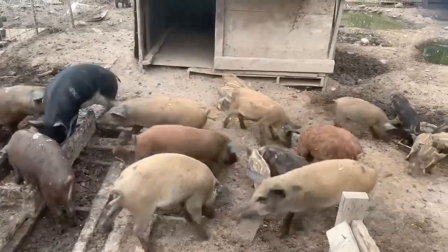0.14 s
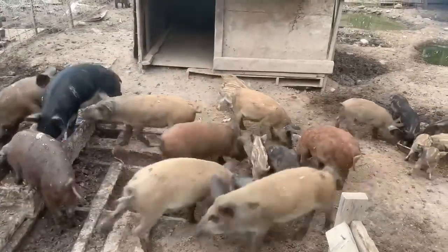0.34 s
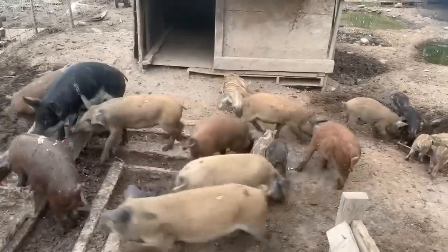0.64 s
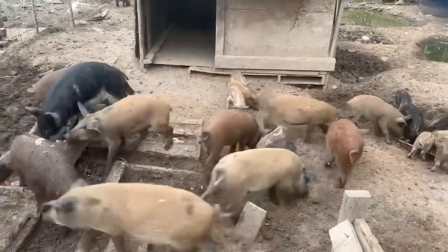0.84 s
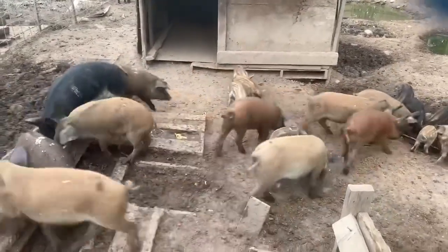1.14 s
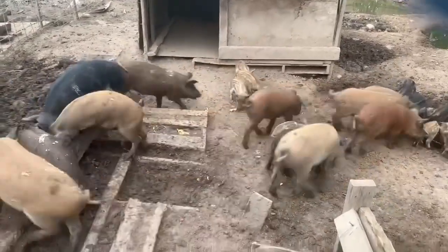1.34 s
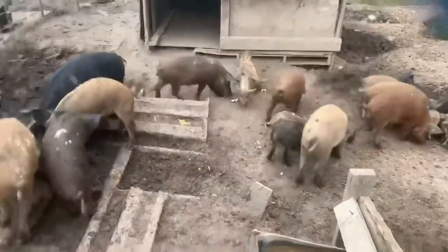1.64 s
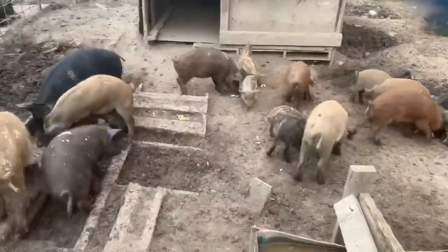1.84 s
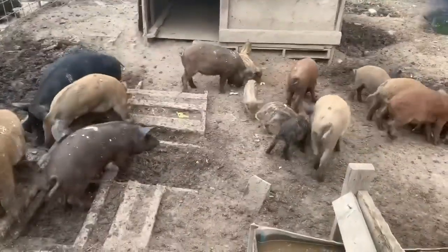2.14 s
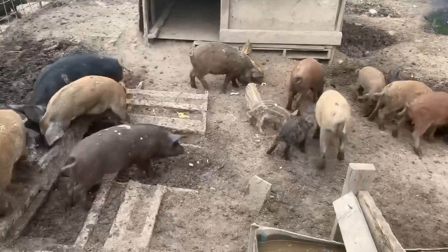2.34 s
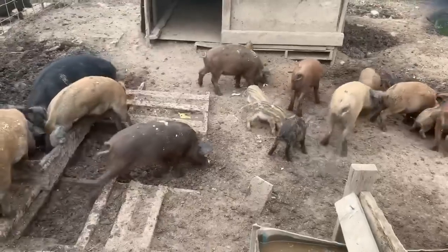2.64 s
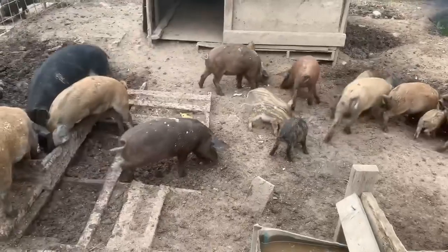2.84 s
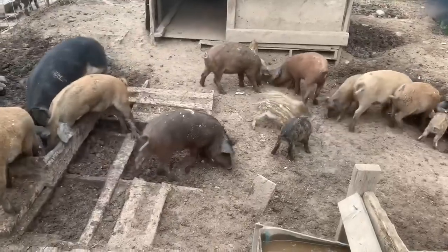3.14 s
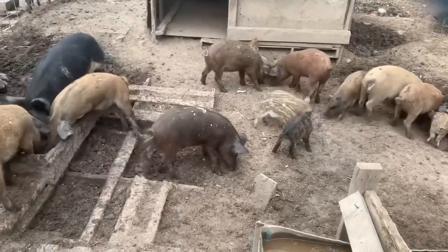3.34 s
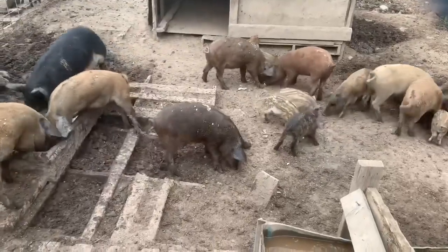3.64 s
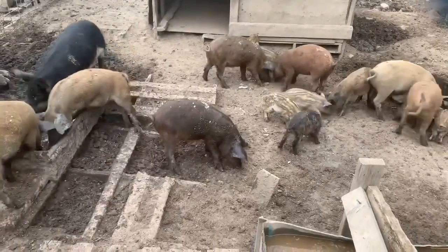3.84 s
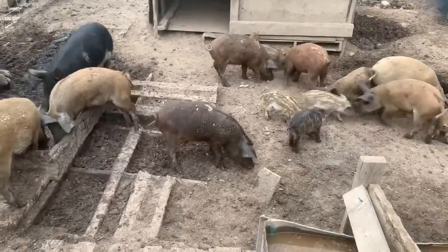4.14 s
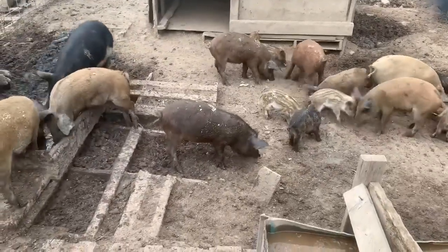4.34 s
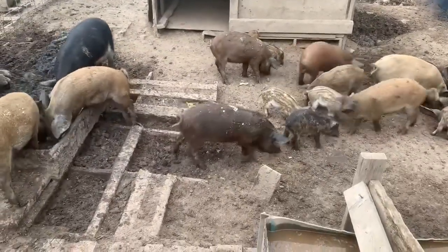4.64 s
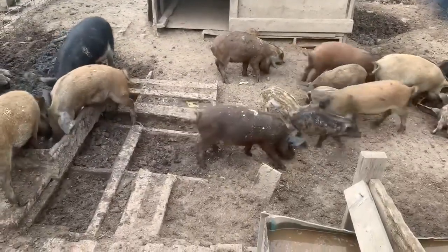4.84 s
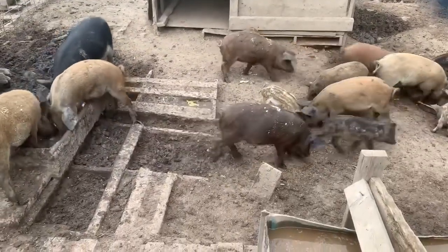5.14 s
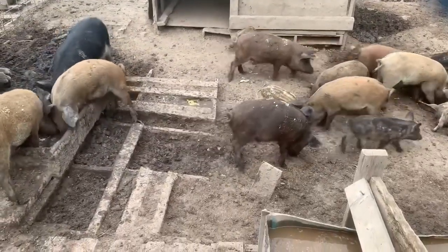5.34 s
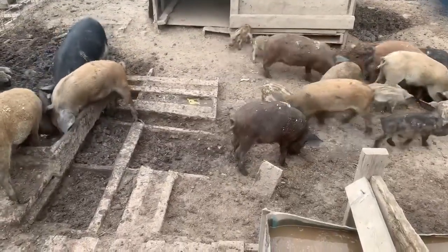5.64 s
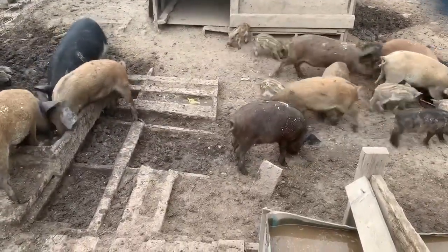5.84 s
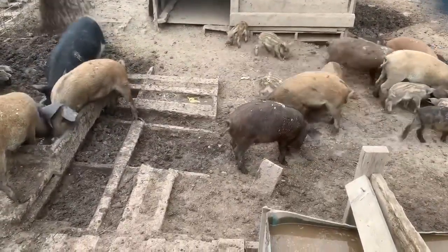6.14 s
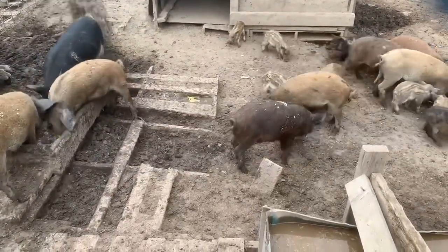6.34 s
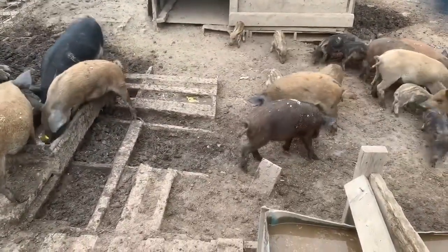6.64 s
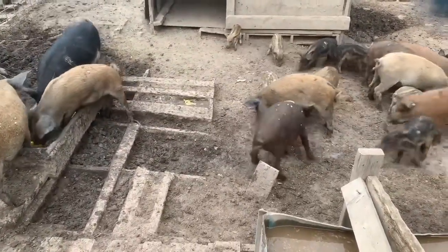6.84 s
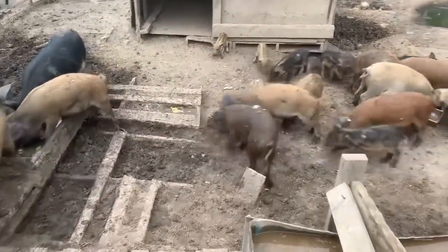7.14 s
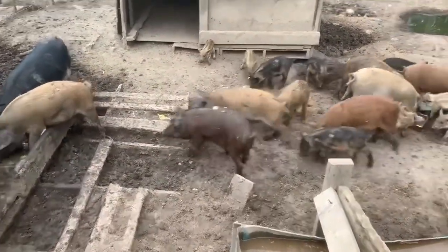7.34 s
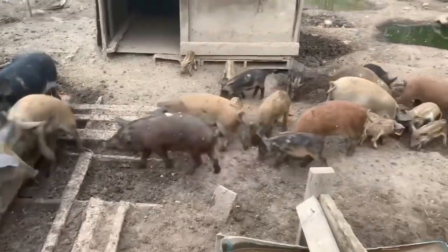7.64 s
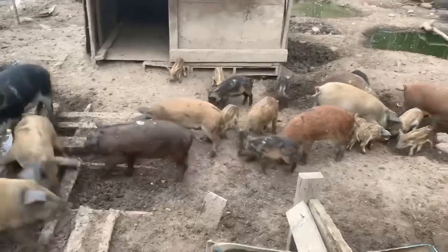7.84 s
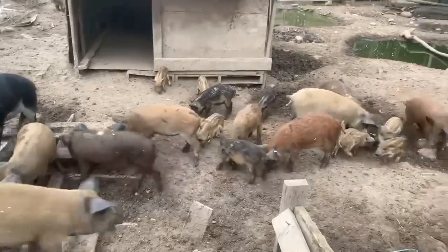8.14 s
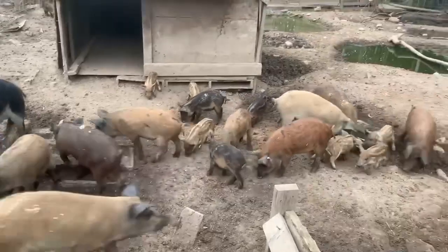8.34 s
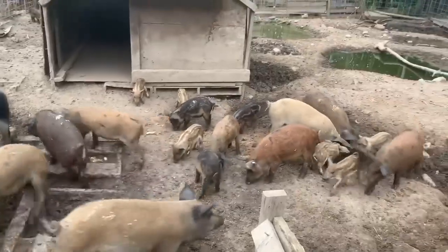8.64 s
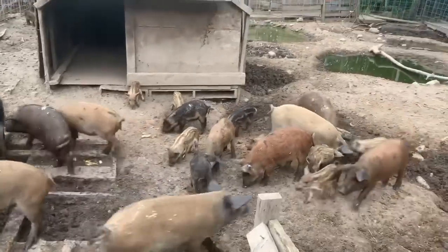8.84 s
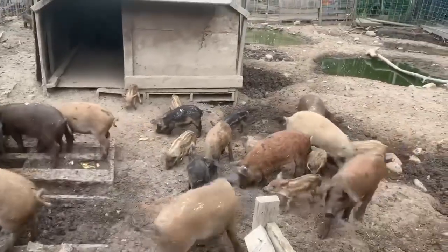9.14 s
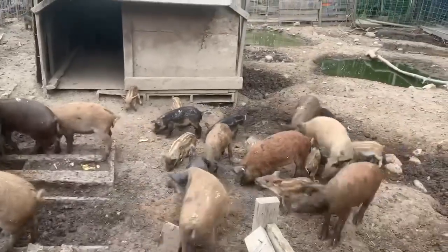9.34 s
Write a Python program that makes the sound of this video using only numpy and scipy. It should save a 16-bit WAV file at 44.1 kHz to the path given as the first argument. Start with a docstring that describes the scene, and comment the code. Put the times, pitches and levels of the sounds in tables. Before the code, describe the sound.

In an open farm pen, pigs chew and root. Sharp smacks and rattling board bumps come first, then a chain of guttural grunts from a near pig, densest around three seconds and longer and rougher after seven. Tiny voiced hums, airy sniffs and low herd murmur fill the gaps. Close stereo microphones, bass centred, only faint short echoes.

```python
"""A pig on the left grunts again and again: slow throat flaps ring its chest, throat, mouth and snout.
Around it smaller pigs hum briefly, jaws smack, hooves tap and a wooden trough is bumped on the right;
these are clicks and noise bursts sent through resonances, except the hums, which are sine tones.
The herd behind mutters, sniffs and shuffles in shaped noise. Sparse echoes suggest an open dirt pen."""
import sys
import numpy as np
from scipy import signal
from scipy.io import wavfile
from scipy.ndimage import uniform_filter1d

SR = 44100
rng = np.random.default_rng(int(sys.argv[2]) if len(sys.argv) > 2 else 0)


def dump(signal):
    """Clip the signal to [-1, 1] and save it as 16-bit WAV at the path in sys.argv[1]."""
    limited = np.clip(np.atleast_2d(signal).T, -1, 1)
    pcm = np.round(limited * 32767).astype(np.int16)
    wavfile.write(sys.argv[1], SR, pcm)


N = 418509  # length in samples


def amp(db):
    """Turns decibels into a plain multiplier."""
    return 10 ** (np.asarray(db) / 20)


def to_unit_rms(x):
    """Scales a sound so that its average (RMS) level is 1."""
    return x / np.sqrt(np.mean(x ** 2) + 1e-20)


def to_unit_peak(x):
    """Scales a sound so that its highest peak is 1."""
    return x / (abs(x).max() + 1e-20)


def read_curve(points, hz):
    """Reads a curve of (pitch, value) points, with straight lines on a log pitch scale."""
    f, value = np.transpose(points)
    return np.interp(np.log(hz + 1), np.log(f + 1), value)


def resonate(x, hz, width):
    """One resonance, fixed or gliding: shifts the pitch hz down to zero, smooths, and shifts back."""
    turn = np.exp(2j * np.pi * np.cumsum(hz * np.ones(len(x))) / SR)
    r = np.exp(-np.pi * abs(width) / SR)
    smooth = signal.lfilter([1 - r], [1, -r], x / turn)
    return 2 * (turn * smooth).real


def body(x, modes, factor=1):
    """A set of resonances, each applied twice so that the valleys between them stay dark."""
    total = 0
    for k, (f, w, db) in enumerate(modes):
        ringing = resonate(resonate(x, f * factor, 2 * w), f * factor, w)
        total = total + (-1) ** k * amp(db) * ringing  # neighbours have opposite signs
    return total


def puff(ms, click=2.7, rise=15):
    """A sharp click, and a burst of noise that rises fast and dies away over about ms."""
    u = np.arange(2600) / SR * 1000 / max(ms, .3)
    burst = rng.standard_normal(len(u)) * (1 - np.exp(-rise * u)) * np.exp(-u)
    return burst + click * (np.arange(len(u)) == 12)


def add(mix, s, sound, lead_ms, pan_db):
    """Places a sound: the left ear hears it lead_ms earlier and pan_db louder than the right."""
    for ear, side in zip(mix, (1, -1)):
        part = ear[round((s - side * lead_ms / 2000) * SR):][:len(sound)]
        part += amp(side * pan_db / 2) * sound[:len(part)]


def murmur(spectrum, size, patchy_db, flicker_db, lead_ms):
    """Random short-time spectra with patches and flicker, partly alike in both microphones."""
    # left-right likeness: pitch_hz, likeness (1 = the same, 0 = unrelated)
    likeness = [(60, 0.74), (200, 1), (500, 0.92), (2000, 0.3), (5000, 0.13), (8000, 0.28), (11000, 0.32)]
    hop = size // 4
    frames, hz = N // hop + 5, np.fft.rfftfreq(size, 1 / SR)
    a, b, c, d, patches = rng.standard_normal((frames, len(hz), 5)).T
    patches = to_unit_rms(uniform_filter1d(uniform_filter1d(patches, 5, 0), 8, 1))
    flicker = to_unit_rms(uniform_filter1d(rng.exponential(1, frames) ** .7, 2) - .91)
    same = np.clip(read_curve(likeness, hz), -1, 1)[:, None]
    late = np.exp(-2j * np.pi * hz * lead_ms / 1000)[:, None]  # delays the shared part on the right
    left = a + 1j * b
    right = same * late * left + np.sqrt(1 - same ** 2) * (c + 1j * d)
    z = np.array([left, right])
    z *= amp(read_curve(spectrum, hz)[:, None] + patchy_db * patches + flicker_db * flicker)
    return to_unit_rms(signal.istft(z, nperseg=size, noverlap=size - hop)[1][:, :N])


def herd(breath):
    """Far grunts blur to a mutter, with shuffles and sniffs; the near pig's breath swells the same noise."""
    # loudness of the herd over time: time_s, mutter_db, shuffle_db, sniff_db
    herd_levels = [(0.0, -53, -49.5, -57), (1.32, -47.5, -46.5, -58.5), (1.64, -52, -52.5, -59),
                   (2.77, -44.5, -50, -55), (3.01, -47, -54.5, -58.5), (3.3, -56, -48, -56.5),
                   (3.44, -56, -48.5, -53), (3.72, -49, -50.5, -58), (6.74, -54, -55, -59),
                   (7.1, -50, -54, -60), (7.36, -45, -48.5, -50.5), (7.77, -42.5, -64, -56.5),
                   (7.98, -52, -51, -57.5), (8.27, -48, -51, -55.5), (8.46, -56, -51, -58.5),
                   (8.93, -46.5, -51.5, -57), (9.3, -76, -51, -58.5), (9.49, -44.5, -50.5, -64)]
    # separate sniffs and snorts of air: peak_s, level_db
    sniffs = [(.14, -55), (.99, -65), (1.4, -65), (2.11, -62), (2.75, -66), (4.1, -52), (4.34, -63.5),
              (5.76, -55), (6.98, -55), (7.13, -63), (7.61, -49.5), (7.8, -48), (8.46, -52), (8.72, -58),
              (9.38, -49)]
    # noise colours before overall scaling: pitch_hz, level_db (per Hz)
    mutter_colour = [(15, -53), (25, -42), (86, 9.5), (241, 2), (328, 3), (525, -33.5), (618, -4.5),
                     (1040, -17), (1200, -12), (1560, -21), (2640, -120)]
    shuffle_colour = [(200, -21), (450, 3.5), (650, 5.5), (900, 2.5), (1400, 3), (2500, -5.5), (4000, -8.5),
                      (5500, -41)]
    sniff_colour = [(2500, -38), (4000, 7.5), (6300, 7.5), (7700, 6.5), (8800, -2.5), (10000, 7),
                    (11000, -1.5)]
    rise_s, fall_s = 0.02, 0.03  # of each separate sniff
    s, *columns = np.transpose(herd_levels)
    t = np.arange(N) / SR
    mutter, shuffle, sniff = (amp(np.interp(t, s, c)) for c in columns)
    for at, db in sniffs:
        sniff = sniff + amp(db) * np.exp(np.minimum((t - at) / rise_s, (at - t) / fall_s))
    mutter = np.hypot(mutter, breath[0])
    shuffle = np.hypot(shuffle, breath[1])
    return (mutter * murmur(mutter_colour, size=1024, patchy_db=4.5, flicker_db=0.05, lead_ms=0.1)
            + shuffle * murmur(shuffle_colour, size=256, patchy_db=3.5, flicker_db=-1.0, lead_ms=0.37)
            + sniff * murmur(sniff_colour, size=256, patchy_db=3.5, flicker_db=1.0, lead_ms=0.068))


def smack(s, db, hz, crack_db, thud_db):
    """A wet pop: a crisp crack and fizz, a brief ring of the mouth and a soft thud below."""
    t60_s, fizz_db, thud_hz = 0.038, -2, 217  # time for the pop to fall 60 dB; fizz over the crack
    pop = puff(t60_s * 1000 / np.log(1000), click=5.4)
    ring = body(pop, [(hz, 330, 0)])
    crack = body(pop, [(2040, 280, 8.5), (3980, 1560, 1.0)])
    fizz = body(pop, [(6900, 2700, 0), (10120, 230, 0)])
    thud = body(pop, [(thud_hz, 60, 0), (1.59 * thud_hz, 120, -6)])
    parts = [(0, ring), (crack_db, crack), (crack_db + fizz_db, fizz), (thud_db, thud)]
    return s, sum(amp(db + part_db) * to_unit_peak(part) for part_db, part in parts)


def faint_smacks():
    """The rest of the chewing: quiet smacks at random moments and places."""
    count, level_db = 30, -45
    # start s, level dB, ring Hz, crack dB, thud dB, left lead ms
    low = [0, level_db - 5, 700, -18, -15, -.3]
    high = [N / SR - .1, level_db + 5, 1900, -5, 0, .3]
    return rng.uniform(low, high, (count, len(low)))


def bump(s, db, boom_db, ms, tilt_db):
    """A short scrape rattles and booms the trough's boards; tilt_db brightens or dulls the rattle."""
    # resonances of the trough: pitch_hz, width_hz, level_db (the rattle's before its tilt)
    boom_modes = [(82, 76, -9), (250, 180, -18.5), (338.6, 54, 2), (441, 64, -6), (749, 29, -7)]
    rattle_modes = [(1500, 274, 19.5), (1950, 195, 17), (2240, 214, 11), (3370, 200, 2.5),
                    (3470, 550, -5.5), (4350, 500, -2.5)]
    boom_drag = 1.22  # the boom is driven this many times longer than the rattle
    lowest_hz = rattle_modes[0][0]
    tilted = [(f, w, mode_db + tilt_db * np.log2(f / lowest_hz)) for f, w, mode_db in rattle_modes]
    boom = body(puff(ms * boom_drag, click=0.66, rise=5.6), boom_modes)
    rattle = body(puff(ms, click=0.93, rise=2.1), tilted)
    return s, amp(db) * (to_unit_peak(rattle) + amp(boom_db) * to_unit_peak(boom))


def voiced(drive, modes, hz):
    """A group of resonances, its levels counted from the first one ringing at unit strength."""
    first = body(drive, [(*modes[0][:2], 0)], hz)
    return body(drive, modes, hz) / np.sqrt(np.mean(first ** 2))


def grunt(rows, flaps, voice):
    """Each slow flap of the throat spits a puff through mouth and snout; the chest booms just after."""
    # chest and throat resonances: pitch_hz, width_hz, level_db
    chest_modes = [(80.8, 24, 7), (111, 21.3, 4), (165.6, 22, -5.5), (276.7, 49, -2.5)]
    throat_modes = [(571, 129, -3.5), (786, 17, -38)]
    # mouth and snout resonances: factor on the moving mouth or snout pitch, width_hz, level_db
    mouth_modes = [(0.992, 116, 6), (1.154, 190, -10), (0.902, 150, -5.5)]
    snout_modes = [(0.999, 160, -3.5), (0.819, 152, -6.5), (1.08, 140, -8), (1.21, 160, -12.5),
                   (1.39, 170, -9), (1.68, 180, -19), (2.1, 494, -25.5)]
    throat_follows_mouth = 0.52  # share of the mouth's level swings in the throat
    snout_follows_mouth, snout_wander = .3, .012  # share of pitch glides (as a power); drift, share of pitch
    rumble_db, rasp_db = -8, -5  # low breath noise over the chest; high breath noise over the head

    s, *columns = np.transpose(rows)
    t = np.arange(s[0], s[-1], 1 / SR)
    chest_db, open_db, mouth_hz = (np.interp(t, s, c) for c in columns)
    (throat_db, mouth_db, snout_db, chest_hz, start_hz, end_hz,
     glide_at, glide_share, lower_db, upper_db, swell_db) = voice
    first, per_s, speed_up, fastest, rough_start, rough_end = flaps
    along = np.linspace(0, 1, len(t))
    rough = rough_start + (rough_end - rough_start) * along ** 1.5

    # snout pitch: its own glide, part of the mouth's glide, and a slow random drift
    glide = np.clip((along - glide_at) / max(glide_share, .05) + .5, 0, 1)
    drift = to_unit_rms(uniform_filter1d(uniform_filter1d(rng.standard_normal(len(t)), 2000), 2000))
    snout_hz = start_hz + (end_hz - start_hz) * glide
    snout_hz = snout_hz * (mouth_hz / mouth_hz.mean()) ** snout_follows_mouth
    snout_hz = snout_hz * (1 + snout_wander * drift)

    # count the flaps: each whole turn is one flap
    wobble = to_unit_rms(uniform_filter1d(rng.standard_normal(len(t)), 900))
    rate = np.minimum(per_s + speed_up * np.maximum(t - first, 0), fastest)
    turns = np.cumsum(rate) / SR
    turns = turns - np.interp(first, t, turns)
    turns = np.maximum.accumulate(turns + .5 * rough ** 2 * wobble)  # rough flaps come unevenly
    flap = np.diff(np.floor(turns), prepend=np.floor(turns[0])) / np.sqrt(rate)
    flap *= amp(7.1 * rough * rng.standard_normal(len(t)))  # and with uneven strength
    since_ms = turns % 1 / rate * 1000  # time since the last flap

    # the head gets puffs of air and clicks; the chest gets the flaps 4.1 ms later
    air = rng.standard_normal((2, len(t)))
    spit = to_unit_rms(air[0] * (1.1 * rough ** 2 + since_ms / 1.8 * np.exp(-since_ms / 1.8)))
    clean_flap = (1 - rough) * to_unit_rms(flap)
    drive = spit + 1.6 * clean_flap
    push = np.roll(clean_flap + 2.95 * rough * air[1], round(0.0041 * SR))
    chest = to_unit_rms(body(push, chest_modes))
    chest = chest + 0.87 * to_unit_rms(resonate(push, chest_hz, 25.0))

    swing_db = throat_follows_mouth * (open_db - open_db.mean())
    sides = [(f, w, db + (lower_db if f < 1 else upper_db)) for f, w, db in snout_modes[1:]]
    snout = snout_modes[:1] + sides
    snout_db = snout_db + swell_db * (along - .5)
    head = (amp(throat_db + swing_db) * voiced(drive, throat_modes, 1)
            + amp(mouth_db + open_db) * voiced(drive, mouth_modes, mouth_hz)
            + amp(snout_db + open_db) * voiced(drive, snout, snout_hz))
    effort = amp(chest_db) * signal.windows.tukey(len(t), .1)
    breath = effort * amp([rumble_db + 0 * t, rasp_db + open_db])
    return s[0], effort * to_unit_rms(chest), effort * head, breath


def hum(s, length, hz, glide, db):
    """A few clean cycles of a closed-mouth voice, overtones weak."""
    peak_at, fade_db = .3, -22  # loudest at this share of the length; drop at both ends
    t = np.arange(0, length, 1 / SR)
    angle = 2 * np.pi * np.cumsum(hz + glide * t) / SR
    tone = np.sin(angle) + 0.15 * np.sin(2 * angle) + 0.15 * np.sin(3 * angle)
    fade = np.interp(t / length, [0, peak_at, 1], [1, 0, 1]) ** 2
    return s, np.sqrt(2) * amp(db + fade_db * fade) * tone * signal.windows.tukey(len(t), .3)


def yard(x):
    """Sparse echoes from ground, shed and fence, dying fast in the open air."""
    t = np.arange(6000) / SR
    signs = rng.choice([-1., 1.], (2, len(t)))
    chosen = rng.random((2, len(t))) < .04
    taps = signs * chosen * amp(-60 * t / 0.094) * (t > .003)  # falls 60 dB in 0.094 s
    taps = uniform_filter1d(taps, 3, axis=1)
    low_cut = signal.butter(1, 300, "high", fs=SR)
    echoes = signal.oaconvolve(x, taps / np.linalg.norm(taps[0]), axes=1)[:, :N]
    return signal.lfilter(*low_cut, echoes)


def scene():
    """Places every near sound, then adds its echoes and the herd behind."""
    # path of each grunt, a list of points: time_s, chest_db, head_db (over the chest), mouth_pitch_hz
    efforts = [
        [(0.53, -82, -2, 1860), (0.55, -55, -19, 1900), (0.56, -52, -11, 1920), (0.588, -49, -28, 1890),
         (0.62, -65, -6, 1690), (0.64, -51, -7, 1690)],
        [(0.8, -45, -1, 1750), (0.842, -43, -25, 1830), (0.854, -51, 7, 1890), (0.874, -48, -43, 1680),
         (0.896, -47, -14, 1580), (0.96, -78, -22, 1776)],
        [(2.02, -42, -2, 1810), (2.044, -40.5, -11, 1840), (2.104, -38, -4, 1730), (2.16, -43.5, 0.5, 1800),
         (2.21, -45, -2, 1340), (2.284, -42, -7, 1340), (2.37, -47.5, -2, 1790)],
        [(2.5, -67, -6, 1750), (2.52, -43.5, -6, 1690), (2.534, -39.5, -14.5, 1720), (2.58, -40, -4, 1900),
         (2.61, -36.5, -17, 1860), (2.71, -46, -27, 1580)],
        [(2.82, -33.5, -13, 1680), (2.874, -50, 6.5, 1950), (2.926, -42.5, -3, 1870), (2.942, -43.5, -9, 1740),
         (2.968, -59, 9, 1520), (2.99, -48, -11, 1500)],
        [(3.25, -43, -19, 1890), (3.3, -40, -8, 1870), (3.35, -37, -6.5, 1770), (3.4, -38.5, -1.5, 1750),
         (3.43, -34.5, -8.5, 1400), (3.475, -38, -7.5, 1380), (3.51, -31, -17, 1430)],
        [(3.495, -31, -49, 1700), (3.52, -38.5, -2.5, 1690), (3.555, -41.5, -14, 1700), (3.59, -44, -1.5, 1780),
         (3.63, -70, 1, 1750)],
        [(3.94, -45, 1, 1730), (3.964, -40, -2.5, 1720), (4.034, -35.5, -11, 1900), (4.038, -32, -7, 1900),
         (4.088, -38, -19, 1820), (4.12, -48, 13, 1870)],
        [(4.41, -50.5, 7, 1780), (4.484, -45, -10, 1650), (4.498, -37, -22, 1700), (4.572, -41, -0.5, 1680),
         (4.698, -42, -12.5, 1420), (4.73, -61, -22, 1840)],
        [(5.55, -63.5, -43, 1660), (5.564, -49.5, -6, 1800), (5.61, -48, -13.5, 1490), (5.696, -43, 0, 1694),
         (5.794, -39.5, -3.5, 1530), (5.83, -49, -22, 1570)],
        [(5.97, -45, -11, 1560), (5.99, -50.5, 2.5, 1590), (6.048, -53, -3, 1610), (6.09, -51, -7, 1780),
         (6.11, -47, -37, 1720), (6.14, -60, -10, 1740)],
        [(6.23, -41, -14, 1780), (6.25, -43.5, -17.5, 1800), (6.278, -42, -8.5, 1860), (6.31, -43, -10.5, 1830),
         (6.336, -42.5, -6, 1790), (6.34, -47, 1, 1690), (6.424, -49, -32, 1660), (6.46, -80, -12, 1490)],
        [(6.55, -25, -4, 1520), (6.564, -62, -8, 1530), (6.59, -48, -6.5, 1640), (6.658, -44.5, -20, 1360),
         (6.674, -60, -35, 1510), (6.69, -67, -16, 1570)],
        [(6.86, -51, 13, 1790), (6.87, -51, 4.5, 1820), (6.922, -40.5, -4.5, 1600), (6.974, -40.5, -5.5, 1890),
         (7.012, -38.5, -14, 1820), (7.04, -52, -22, 1740)],
        [(7.14, -52, -11, 1570), (7.146, -54, -26, 1570), (7.156, -44, -16, 1520), (7.22, -38, -6, 1640),
         (7.258, -42.5, -7, 1500), (7.3, -61, -17, 1640)],
        [(7.36, -51, -2, 1520), (7.44, -46.5, -7, 1560), (7.49, -42, -5.5, 1630), (7.6, -42, 0, 1710),
         (7.64, -42.5, -4.5, 1760), (7.71, -43, 4, 1830)],
        [(7.695, -44, -0.5, 1770), (7.73, -43.5, 2, 1840), (7.806, -48.5, 8.5, 1705), (7.86, -45, 4, 1890),
         (7.914, -43, 1, 1950), (7.95, -46, 1, 1850), (8.0, -47, -19, 1800)],
        [(8.25, -50, -18, 1550), (8.324, -39, -25, 1790), (8.344, -49, -4, 1780), (8.404, -34.5, -12, 1550),
         (8.46, -37, -10.5, 1500), (8.53, -38, -8.5, 1700), (8.624, -40, -5.5, 1690), (8.67, -50, -25, 1700)],
        [(8.69, -56, -8, 1670), (8.748, -48.5, 11.5, 1500), (8.764, -77, -10, 1620), (8.8, -44, -3, 1740),
         (8.814, -44, 0, 1790), (8.83, -52, -16, 1780)],
        [(9.05, -47, -15.5, 1650), (9.095, -41, -4, 1670), (9.125, -38, -12, 1460), (9.174, -37, -8, 1480),
         (9.224, -36.5, -13.5, 1630), (9.278, -41.5, -4.5, 1690), (9.34, -41.5, -4, 1570),
         (9.41, -44, -9, 1490)],
    ]
    # flapping of each grunt: first_flap_s, flaps per s, speed-up (flaps per s per s), fastest flaps per s,
    # roughness at start and at end (0-1)
    flappings = [(.575, 31, 0, 31, .4, .55), (.814, 29.4, 0, 30, .4, .55), (2.034, 40, 15, 45, .04, .15),
                 (2.515, 28.5, 54, 40, .06, .2), (2.83, 38, 0, 38, .3, .45), (3.272, 43, -28, 43, .07, .2),
                 (3.512, 57, 0, 57, .15, .2), (3.953, 32, 60, 42, .05, .2), (4.426, 38.5, -36, 39, .07, .2),
                 (5.565, 30.5, 25, 38, .06, .2), (5.985, 33, 0, 33, .35, .5), (6.24, 28, 36, 36, .05, .25),
                 (6.56, 35, 0, 35, .35, .5), (6.872, 29.5, 54, 38, .04, .2), (7.17, 27, 0, 27, .4, .55),
                 (7.505, 25, 250, 62, .05, .25), (7.708, 69, 0, 69, .08, .42),
                 (8.361, 26, 240, 66, .1, .33), (8.705, 40, 0, 40, .45, .6), (9.061, 28, 135, 60, .08, .42)]
    # voice of each grunt: throat_db (over the chest), mouth_db and snout_db (over the head's level),
    # chest_pitch_hz, snout_start_hz, snout_end_hz, middle and length of the snout's glide (shares of the
    # grunt), lower_side_db and upper_side_db (snout resonances), snout_swell_db (start to end)
    voices = [(-26, -10, -15, 75, 2900, 2400, .5, .9, 0, 0, 0),
              (-3, -4, -11, 116, 890, 1000, .5, .9, -6, -4, -6.5),
              (-4.5, -13.5, -3, 184, 2330, 2830, 0.47, .2, -2, -9, -6),
              (-9, -3.5, 1, 117, 2940, 3300, 0.28, .5, 4, 2.5, -12),
              (-2.5, -15, -15.5, 173, 2100, 3700, 0.41, 1, -3, -3, -13),
              (-12, -2, -5.5, 163, 3400, 2700, 0.63, 0.16, 1, 1.5, -4),
              (-3, 2, -4, 202, 2700, 3300, 0.52, 0.57, 1, 2.5, 10),
              (-7.5, -10.5, -6, 126, 2860, 2880, .5, .9, -4, -1, 4),
              (-4, -7.5, -10.5, 130, 2500, 3600, 0.52, .9, -3, 2, -1),
              (-3, -5, -4, 123, 2920, 2950, .5, .9, -5, 1.5, 8),
              (-4, -9, -13.5, 184, 4100, 3100, 0.58, .9, 5, 1, -5),
              (-12.5, -3, 2.5, 119, 3680, 3500, .5, 0.81, -3, -6, 17),
              (-16, 1.5, -6.5, 183, 3600, 2770, 0.52, 0.83, 6, 12.5, 0),
              (-8, -4, -1.5, 173, 2570, 3400, 0.52, 0.62, 4, 3, 5.5),
              (-15, -17, -9, 167, 2500, 2530, .5, .9, 4, -1, 0),
              (-7, -9, -3.5, 170, 2830, 3300, .78, 0.18, -5, -9, 9.5),
              (3.5, -7, 4.5, 202, 3300, 3080, .2, .3, -7, 0, -1.5),
              (-4, -4, -4.5, 144, 2860, 3050, .65, .4, -3, -3.5, 4),
              (-24, -6.5, -8, 200, 2430, 2070, 0.53, .9, -7, -8, -3),
              (-3, -3.5, -4, 131, 2930, 2870, 0.46, .9, -7, -1.5, -2)]
    # short hums of smaller pigs: start_s, length_s, pitch_hz, glide_hz_per_s, level_db
    hums = [(1.087, 0.055, 290, -3200, -29.5), (2.035, 0.061, 176.7, 150, -29.5),
            (2.751, 0.026, 261, 1, -33.5), (4.506, 0.085, 206, 1001.5, -36), (5.18, 0.018, 238, 7.5, -30.5),
            (5.219, 0.034, 306, 30.5, -30), (6.241, 0.027, 240, -800, -36.5),
            (8.356, 0.036, 225, -500, -40), (7.455, 0.069, 175, 10, -39.5), (8.7, 0.051, 365, -1200, -44.5),
            (1.769, .06, 479, -4, -53), (.575, .04, 75, 0, -41), (8.782, 0.027, 206, 6, -38.5)]
    # trough bumps: start_s, rattle_peak_db, boom_db (over the rattle), scrape_ms, tilt_db (per octave)
    bumps = [(0.3107, -28, -2, 1.2, -3), (0.3464, -18, -6.5, 1.45, 8.5), (0.353, -26, -6, 1.4, 10),
             (.366, -35.5, 4, 4, 17), (0.385, -36, -3, 3.8, 17), (.394, -35.5, 1, 4.5, 10),
             (0.691, -23.5, -7.5, 6.4, -29), (0.7038, -21.5, -4.5, 5, -6), (0.7157, -25, 0.5, 7.1, 12),
             (0.7258, -15, -13.5, 5.2, 6), (0.7416, -35, 5, 5.2, 20), (1.22, -35, 3.5, 6.7, 9),
             (1.255, -34.5, 2, 6, 0), (1.273, -20, -7.5, 4, 9.5), (1.295, -36, -1, 6.7, 1),
             (1.3139, -29, -1, 6.6, 1), (5.187, -37.5, 1.5, 8, 12), (5.229, -27.5, 4.5, 1.9, -3),
             (7.247, -35, -16, 3.2, 0)]
    # jaw smacks and hoof taps: start_s, ring_peak_db, ring_hz, crack_db and thud_db (over the ring),
    # left_lead_ms
    smacks = [(0.07, -28.5, 2190, -14, -37, -0.034), (0.143, -37.5, 786, 3, -43, 0.28),
              (.335, -40.5, 8100, -1, -30, 0), (0.558, -36.5, 2200, -3, -18, -0.45),
              (0.623, -46, 4280, 4, -30, 0), (0.645, -41, 1840, -11, -9, -0.2),
              (0.778, -33, 1770, -10, -11, 0.35), (0.892, -37.5, 1400, -8, -12, 0.13),
              (0.918, -44, 1900, -5, -21, -0.026), (1.0295, -32.5, 1900, -12, -31, 0.089),
              (1.031, -34, 760, -30, -20, .12), (1.06, -46, 1850, -11, -29.5, 0.044),
              (1.0795, -27.5, 1840, -11, -30, .11), (1.08, -22.5, 674, -13, -29, 0.14),
              (1.0945, -24.5, 600, -10, 3, 0.13), (1.349, -31, 830, -11, -24, 0.37),
              (1.402, -38.5, 1830, -4, 1.5, 0.13), (1.522, -37.5, 770, -25, -8, 0.3),
              (1.677, -35.5, 1030, -7, 0.5, 0.14), (1.716, -40, 1360, -27, -31, 0.13),
              (1.812, -37, 820, -30, -12, -0.042), (1.888, -36, 670, -4, -14, 0.4),
              (2.02, -42, 765, -22, -17, .3), (2.034, -21, 720, -38, -5.5, 0.46),
              (2.085, -29, 2260, -5.5, -18, 0.47), (2.105, -36.5, 2280, 5, -20, 0.1),
              (2.275, -39.5, 5000, 7.5, -24, 0.22), (2.333, -35.5, 1740, -9, -1, 0.38),
              (3.618, -37, 1650, -1.5, -30, 0), (3.788, -38.5, 690, 4, -3.5, -0.25),
              (4.113, -28, 2010, -19, -15, 0.18), (4.354, -36.5, 3400, -25, -30, 0.095),
              (4.364, -37, 3600, -25, -30, .16), (4.555, -27.5, 457, -25, -10, 0.36),
              (4.564, -30.5, 1770, -17, 1, 0.14), (4.623, -32.5, 2920, -5.5, -10, 0.29),
              (5.148, -30.5, 990, -3, -8.5, -0.3), (5.858, -31, 714, -10, -22, -0.34),
              (6.23, -44, 3380, -3, -20, 0), (6.239, -35.5, 550, -18, -0.5, 0.32),
              (6.785, -30, 1410, -27, -28, 0.086), (7.128, -42, 1400, -13, -2, -0.021),
              (8.213, -35, 1050, -4.5, -18, 0.088), (8.242, -41.5, 980, 1, -20, 0.093),
              (8.272, -37.5, 1030, -6, -27, -0.16), (8.739, -37.5, 710, -1, 1, 0.22),
              (9.382, -49, 5460, 0, -30, 0), (9.395, -26, 1370, -5, -23, -0.043),
              (9.451, -40, 1170, -9, -17, -0.014)]
    near, breath = np.zeros((2, 2, N))
    for rows, flaps, voice in zip(efforts, flappings, voices):
        s, chest, head, air = grunt(rows, flaps, voice)
        add(near, s, chest, lead_ms=.25, pan_db=.5)
        add(near, s, head, lead_ms=0.34, pan_db=2.5)  # the treble is shadowed on the far side
        breath[:, round(s * SR):][:, :len(head)] += air
    for row in hums:
        add(near, *hum(*row), lead_ms=0.05, pan_db=-1.5)
    for row in bumps:
        add(near, *bump(*row), lead_ms=-0.325, pan_db=0.0)
    for *row, lead_ms in [*smacks, *faint_smacks()]:
        add(near, *smack(*row), lead_ms=lead_ms, pan_db=2.4 * lead_ms)
    return near + amp(-9) * yard(near) + herd(breath)


def record(dry):
    """The microphone pair is near mono in the bass; then the treble is cut off above 11250 Hz."""
    mid, side = (dry[0] + dry[1]) / 2, (dry[0] - dry[1]) / 2
    side = side - .72 * signal.filtfilt(*signal.butter(3, 230, fs=SR), side)
    pair = np.array([mid + side, mid - side])
    treble_cut = signal.firwin(151, 11250, window=("kaiser", 8), fs=SR)
    return signal.oaconvolve(pair, treble_cut[None], "same")


dry = scene()
out = record(dry)
dump(out)
```